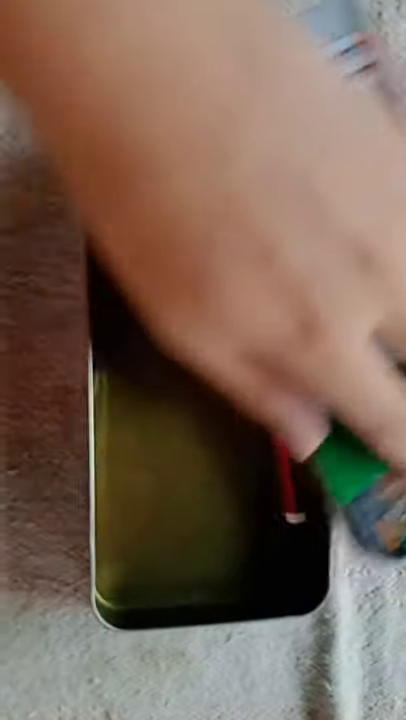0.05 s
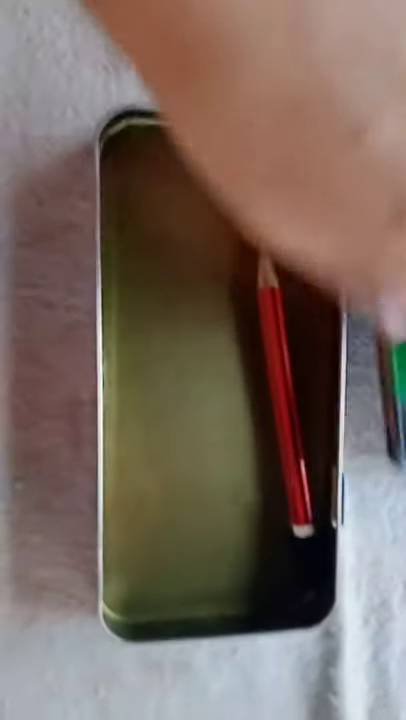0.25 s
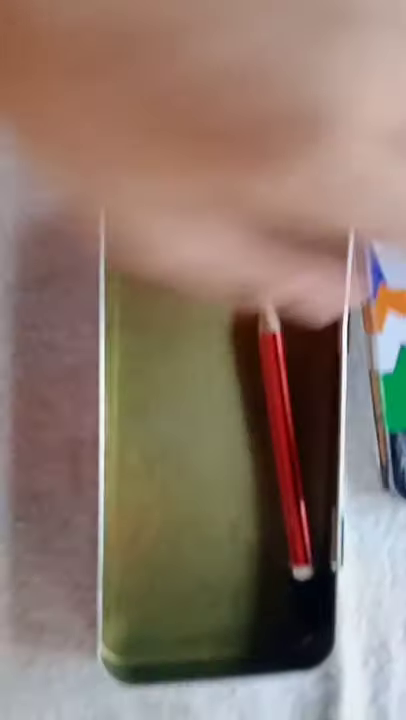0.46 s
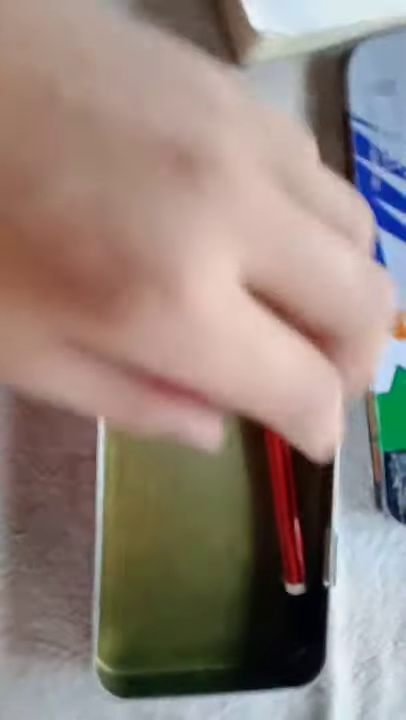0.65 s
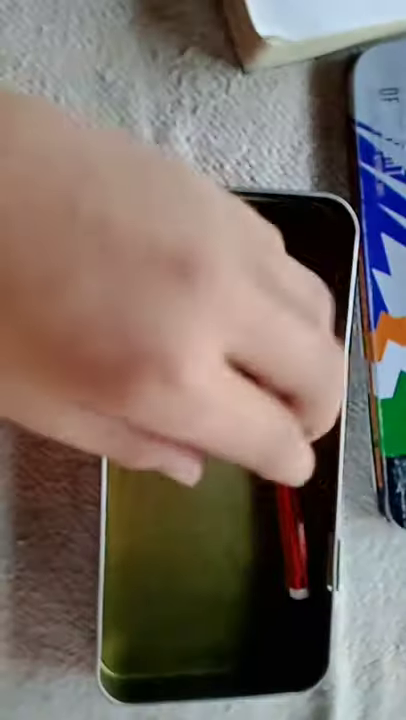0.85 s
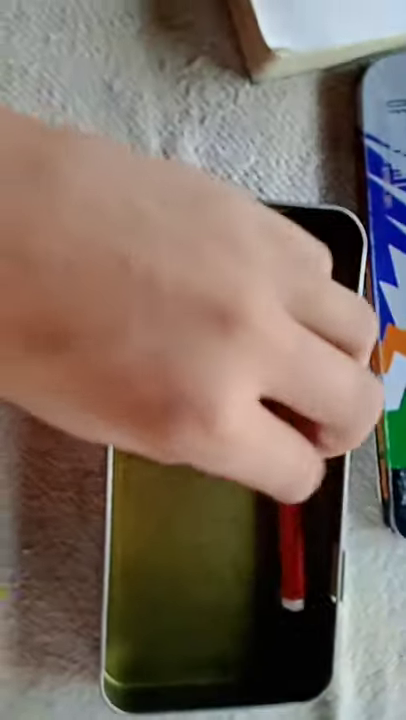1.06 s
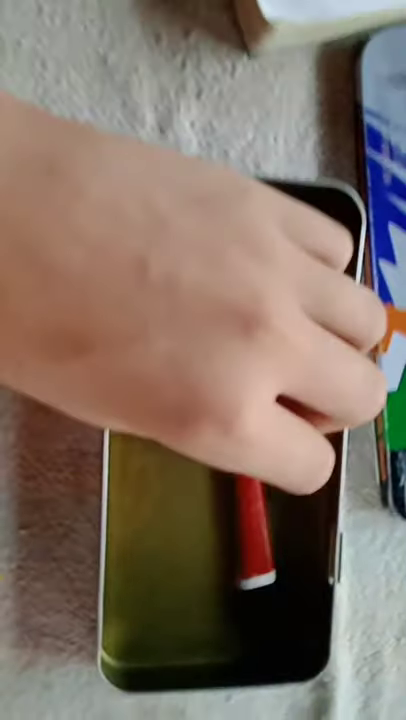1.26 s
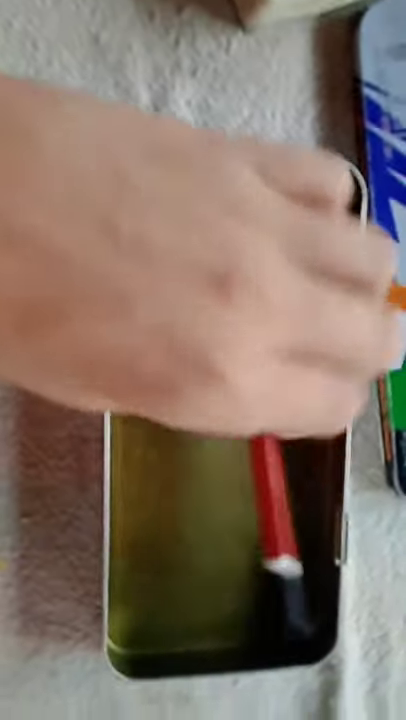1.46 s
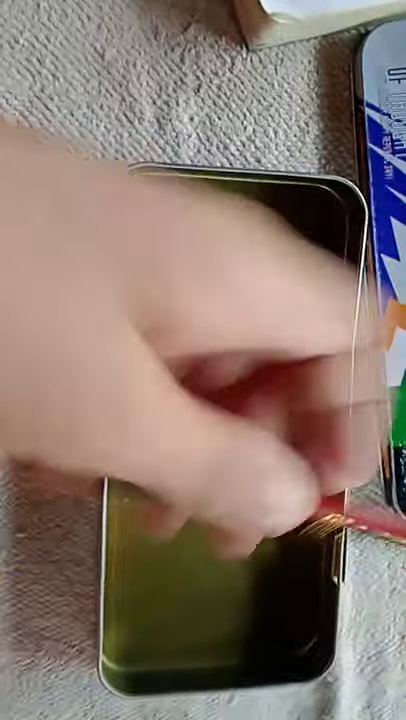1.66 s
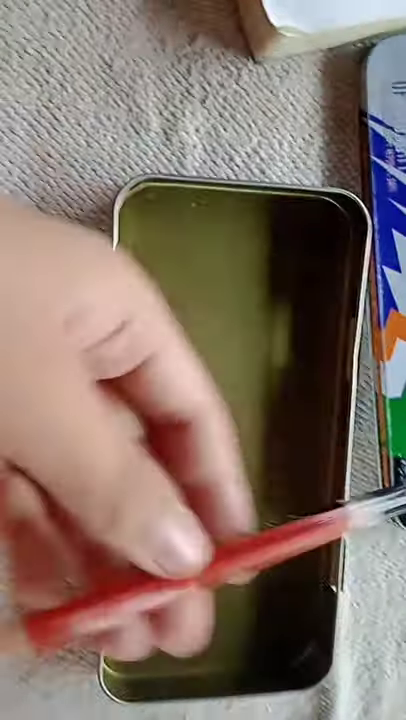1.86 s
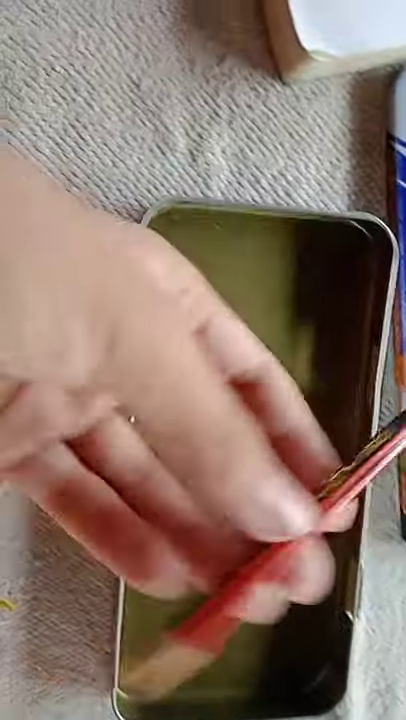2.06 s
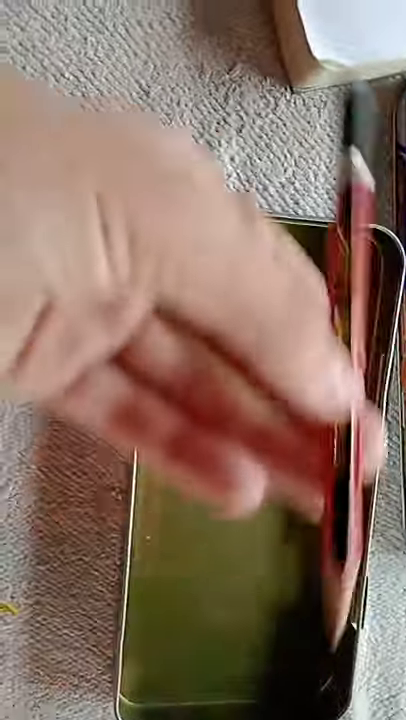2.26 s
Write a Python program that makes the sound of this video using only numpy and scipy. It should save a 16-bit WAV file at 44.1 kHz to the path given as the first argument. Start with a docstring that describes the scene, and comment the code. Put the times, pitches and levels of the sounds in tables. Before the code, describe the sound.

A metal pencil tin is opened close by in a quiet room. After light taps at the start, the thin lid scrapes along the rim at about 0.2 seconds and clatters brightly from 0.3 to 0.5. It slides with a faint hiss until 0.8. A light tap comes at 0.9, a faint pencil scratch near 1.45, and a very soft hand bump around 2 seconds.

```python
"""Light taps on a pencil tin, then its thin metal lid scrapes along the rim and clatters down beside it.
The lid slides briefly on the table cloth; a pencil is picked out, touching the tin lightly.
Scrape, knocks and taps are runs of tiny contacts ringing the metal, damped while a hand holds it.
The hand bumps the table and a quiet room murmurs underneath.
The microphone is close and narrow-band, with little above 7.7 kHz."""
import sys
import numpy as np
from scipy import signal
from scipy.fft import rfft, irfft
from scipy.io import wavfile
from scipy.ndimage import uniform_filter1d

SR = 44100
rng = np.random.default_rng(int(sys.argv[2]) if len(sys.argv) > 2 else 0)


def wav_out(sig):
    """Save sig, one row per channel (or a flat mono array), as 16-bit PCM at SR to the path in sys.argv[1]."""
    wavfile.write(sys.argv[1], SR, np.round(np.clip(np.atleast_2d(sig).T, -1, 1) * 32767).astype(np.int16))


N = 101429
TIME = np.arange(N) / SR

# spectrum of the tin under a soft contact, mostly its middle modes: frequency_hz, level_db
SOFT_CONTACT_SPECTRUM = [(1700, -43.5), (2200, -20), (2500, -33.5), (2850, -2), (3200, -3.5), (3650, -4.5),
                         (3820, -18), (4050, -49.5), (7000, -71.5)]


def amp(db):
    """Decibels to gain."""
    return 10 ** (np.asarray(db) / 20)


def unit(x):
    """Scales to an rms of 1."""
    return x / np.sqrt(np.mean(x ** 2) + 1e-20)


def decay(t, t60_s):
    """Exponential fade, 60 dB down after t60_s."""
    return np.exp(-np.log(1000) * t / t60_s)


def curve_at(points, hz):
    """Reads a curve on a log-frequency axis."""
    point_hz, value = np.transpose(points)
    return np.interp(np.log(hz + 1), np.log(point_hz), value)


def envelope(points, column=1):
    """Gain over time from a column of a dB curve; silent outside it."""
    rows = np.array(points)
    return amp(np.interp(TIME, rows[:, 0], rows[:, column], left=-140, right=-140))


def causal_filter(x, gain):
    """Applies a gain per frequency at minimum phase, so nothing rings ahead of the sound."""
    cepstrum = irfft(np.log(np.maximum(gain, 1e-5)))
    cepstrum[1:len(x)] *= 2
    cepstrum[len(x) + 1:] = 0
    return irfft(rfft(x, 2 * len(x)) * np.exp(rfft(cepstrum)))[:len(x)]


def colour(x, spectrum):
    """Filters by a spectrum that falls away steeply below its first point."""
    hz = np.fft.rfftfreq(2 * len(x), 1 / SR)
    low_cut = np.minimum(hz / spectrum[0][0], 1) ** 2
    return causal_filter(x, amp(curve_at(spectrum, hz)) * low_cut)


def band(x, centre_hz, half_width_hz):
    """Keeps one steep-sided band."""
    hz = np.fft.rfftfreq(2 * len(x), 1 / SR)
    return causal_filter(x, 1 / (1 + ((hz - centre_hz) / half_width_hz) ** 6))


def even_out(x, smoothing_hz=130):
    """Levels the broad humps of a spectrum and keeps its fine modes."""
    power = abs(rfft(x, 2 * len(x))) ** 2
    humps = uniform_filter1d(power / power.mean(), round(smoothing_hz * 2 * len(x) / SR))
    return causal_filter(x, 1 / np.sqrt(abs(humps) + 1e-9))


def add(mix, start_s, level_db, sound):
    """Mixes in a sound whose energy equals that of 20 ms at the given level."""
    gain = amp(level_db) * np.sqrt(.02 * SR) / (np.linalg.norm(sound) + 1e-12)
    part = mix[max(round(start_s * SR), 0):][:len(sound)]
    part += gain * sound[:len(part)]


def room_tone():
    """Low room noise, which sinks under the clatter and creeps back."""
    # murmur of the room: frequency_hz, level_db
    spectrum = [(15, -43.5), (25, -13.5), (70, -3), (103, -7), (256, 1), (434, -7.5), (466, -8),
                (912, -11.5), (1920, -21.5), (2500, -24), (3250, -21.5), (4030, -23.5), (5770, -31),
                (6510, -37.5), (7700, -49.5), (10000, -78.5), (16900, -120)]
    # its loudness: time_s, level_db
    loudness = [(0, -57), (.22, -58), (.33, -65.5), (.5, -73), (.6, -72), (.7, -65.5), (.82, -62.5),
                (1, -59), (1.4, -60), (2.3, -59.5)]
    gain = amp(np.interp(TIME, *np.transpose(loudness)))
    return gain * unit(colour(rng.standard_normal(N), spectrum))


def hand_bumps():
    """Dull swells from the hand moving on the covered table."""
    # soft bumps: start_s, level_db, length_s, pitch_hz
    bumps = [(.1, -58, 0.12, 30), (.13, -61.5, 0.097, 170), (0.401, -64, .17, 89.6), (.88, -63, 0.13, 90),
             (2.015, -56.5, 0.054, 279.6), (2.03, -67, 0.15, 85)]
    out = np.zeros(N)
    for start_s, level_db, length_s, pitch_hz in bumps:
        swell = np.sin(np.pi * np.clip((TIME - start_s) / length_s, 0, 1))
        rumble = unit(band(rng.standard_normal(N), pitch_hz, half_width_hz=.25 * pitch_hz))
        out += amp(level_db) * swell * rumble
    return out


def tin_ring(sheet_db=10.5, crack_db=-1, split_hz=23, partner_gain=.6):
    """The tin's answer to one contact: a crack, a dense shimmer and beating pairs of clear modes."""
    # clear modes of the tin: pitch_hz, relative_db, t60_s
    modes = [(790, -17, .1), (880, -19, .09), (1275, -14, .11), (2080, -22, .09), (2850, -8, .16),
             (2960, -11, .25), (3040, -9, .25), (3110, -11, .23), (3410, -10, .14), (3650, -8, .15),
             (5090, -8, .13), (5243, -14, .24), (5670, -8, .15), (6290, -12, .13), (6600, -12, .15)]
    # dense ring of the sheet metal and the table around it: frequency_hz, t60_s
    sheet_t60 = [(700, .1), (1700, .09), (2300, .12), (3000, .175), (4500, .195), (7500, .18)]
    t = TIME[:SR // 3]
    bin_hz, frame_s, noise_bins = signal.stft(rng.standard_normal(len(t)), SR, nperseg=256)
    fade = amp(-60 * frame_s / curve_at(sheet_t60, bin_hz)[:, None])
    shimmer = signal.istft(noise_bins * fade, SR, nperseg=256)[1][:len(t)]
    crack = rng.standard_normal(len(t)) * decay(t, t60_s=.02)
    ring = amp(sheet_db) * unit(even_out(unit(shimmer) + amp(crack_db) * unit(crack)))
    for (hz, db, t60_s), (phase, partner_phase, split) in zip(modes, rng.random((len(modes), 3))):
        # tin and lid ring in close pairs that beat
        partner_hz = hz + split_hz * (.5 + split)
        tone = np.sin(2 * np.pi * (hz * t + phase))
        partner = partner_gain * np.sin(2 * np.pi * (partner_hz * t + partner_phase))
        ring += .5 * amp(db) * unit((tone + partner) * decay(t, t60_s))
    return ring


def contacts(size, per_s, spread_db):
    """Tiny metal contacts at random moments, of uneven strength."""
    chance, polarity = rng.random((2, size))
    hit = chance < per_s / SR
    hit[0] = True
    strength = amp(spread_db * np.clip(rng.standard_normal(size), -2, 2))
    return hit * np.sign(polarity - .5) * strength


def chatter(ring, length_s, fade_db=10):
    """A quick run of contacts, fade_db weaker after length_s, rings the tin."""
    t = TIME[:len(ring)]
    push = amp(-fade_db * np.minimum(t / length_s, 10) ** 2)
    hits = contacts(len(t), per_s=2900, spread_db=6) * push
    return signal.fftconvolve(hits, ring)[:len(t)]


def metallic_hiss(ring):
    """Faint metallic hiss from just before the scrape, swelling later as the lid slides."""
    # loudness of the hiss: time_s, level_db
    loudness = [(.11, -95), (.135, -74.5), (.2, -75.5), (.46, -68), (.55, -67.5), (.6, -70.5), (.67, -68.5),
                (.72, -65.5), (.77, -72), (.805, -67.5), (.83, -80), (.86, -100)]
    # its colour: frequency_hz, level_db
    spectrum = [(2500, -21), (4200, -2.5), (5250, 3.5), (5900, -6.5), (6700, 5.5), (7300, -7.5),
                (7700, -18)]
    hiss = signal.fftconvolve(rng.standard_normal(N), ring)[:N]
    return envelope(loudness) * unit(colour(hiss, spectrum))


def pencil_scratches(ring):
    """The pencil's tip scratches the bottom of the tin as it is lifted."""
    # strokes of the tip: start_s, level_db, length_s
    scratches = [(1.449, -59.5, 0.017), (1.463, -61.5, 0.0067), (1.812, -76, .003)]
    # the scratched tin: frequency_hz, level_db
    spectrum = [(1500, -31), (3000, 14.5), (4200, 7), (6000, 2), (7200, -2), (7700, -8)]
    out = np.zeros(N)
    for start_s, level_db, length_s in scratches:
        add(out, start_s, level_db, colour(chatter(ring, length_s), spectrum))
    return out


def light_touches(ring, tone_fade_s=.013):
    """Soft contacts stir the tin's middle modes, each with one short tone of its own."""
    # touches on the tin: start_s, level_db, length_s, tone_relative_db, pitch_hz
    touches = [(0.0, -33, 0.0095, -37, 3000), (.008, -35, 0.011, -15, 5465), (0.022, -37, .012, -16, 2210),
               (0.915, -60.5, .006, 8.5, 3030), (0.925, -42.5, 0.0072, -0.5, 3603),
               (1.332, -79, .005, 9, 3430), (1.4444, -71, .006, 11, 6500)]
    tone_fade = np.exp(-TIME[:len(ring)] / tone_fade_s)
    out = np.zeros(N)
    for start_s, level_db, length_s, tone_db, pitch_hz in touches:
        add(out, start_s, level_db, colour(chatter(ring, length_s), SOFT_CONTACT_SPECTRUM))
        tone = band(chatter(ring, length_s), pitch_hz, half_width_hz=172)
        add(out, start_s, level_db + tone_db, tone * tone_fade)
    return out


def rim_scrape(ring):
    """A rim-on-rim scrape, heard first as a narrow ring, then widening to rasp and treble."""
    # loudness of the scrape's three bands: time_s, middle_db, rasp_db, treble_db
    loudness = [(.168, -54.5, -86, -92), (.175, -30, -77.5, -79), (.186, -27, -51.5, -83),
                (.199, -31.5, -33.5, -57), (.211, -41, -23.5, -39), (.225, -41.5, -21, -31.5),
                (.25, -35, -19.5, -31), (.267, -30, -18, -21), (.28, -28, -19.5, -25.5),
                (.288, -37.5, -25, -32), (.298, -33.5, -19.5, -22.5), (.31, -54, -52.5, -43)]
    # their colours: frequency_hz, level_db
    middle = [(2450, -55), (2700, -12), (2900, 0.5), (3120, 0.5), (3450, -5.5), (3700, -22), (4000, -59),
              (7000, -70)]
    rasp = [(1720, -61.5), (1920, -24.5), (2220, -10), (2500, -22.5), (2900, -7), (3550, 1), (4000, -7.5),
            (4280, -20), (4700, -42.5), (7000, -65.5)]
    treble = [(4700, -42.5), (5100, -2.5), (5450, 3), (5750, -2), (6600, -3), (7200, -10), (7700, -27)]
    slips = unit(contacts(N, per_s=2600, spread_db=1))
    out = np.zeros(N)
    for column, spectrum in enumerate([middle, rasp, treble], 1):
        body = colour(ring, spectrum)
        out += signal.fftconvolve(slips * envelope(loudness, column), body / np.linalg.norm(body))[:N]
    return out


def lid_clatter(ring, clank_db=-22, mellow_db=-2, leaning_until_s=.345):
    """The lid drops and rocks against the tin, each knock a short buzz with a thin low clank."""
    # knocks of the landing lid: start_s, level_db, length_s, clank_trim_db
    knocks = [(.2915, -24.5, 0.0097, -9), (0.3016, -16, 0.017, 6.5), (.3145, -18, 0.014, 1),
              (0.327, -20.5, 0.015, 0), (0.3504, -17, 0.017, 3), (0.369, -20, .015, -2.5),
              (0.386, -22, .014, -3.5), (0.3943, -17, .02, 1.5), (0.413, -29, .022, -1)]
    # bright and low parts of a knock: frequency_hz, level_db
    bright = [(1700, -36.5), (2070, 0.5), (2450, -7.5), (2800, 4), (3200, -2.5), (3900, -5), (4600, -6.5),
              (5100, 1.5), (5500, -5), (6550, 1.5), (7200, -7), (7700, -24)]
    clank = [(430, -27), (690, -11.5), (765, 2.5), (950, 3), (1100, -4), (1300, 4.5), (1750, 2.5),
             (2200, -11)]
    out = np.zeros(N)
    for start_s, level_db, length_s, clank_trim_db in knocks:
        buzz = chatter(ring, length_s)
        add(out, start_s, level_db, colour(buzz, bright))
        add(out, start_s, level_db + clank_db + clank_trim_db, colour(buzz, clank))
        if start_s < leaning_until_s:  # still on the rim, the lid rings more in the middle
            mellow = colour(chatter(ring, length_s), SOFT_CONTACT_SPECTRUM)
            add(out, start_s, level_db + mellow_db, mellow)
    return out


def scene():
    """At the table, in mono: the metal rings freely when the lid lands, and is damped while held."""
    free = tin_ring()
    held = free * decay(TIME[:len(free)], t60_s=.25)
    metal = rim_scrape(held) + lid_clatter(free) + light_touches(held) + pencil_scratches(held)
    return (metal + metallic_hiss(free) + hand_bumps() + room_tone())[None]


def record(dry):
    """The close microphone: a brief dip after the clatter, rounded treble peaks, then the band limit."""
    dip_db, dip_at_s, dip_half_width_s = -13, .576, .013
    ceiling, rounding_above_hz, band_edge_hz = .6, 900, 7740
    dipped = dry * amp(dip_db * np.exp(-((TIME - dip_at_s) / dip_half_width_s) ** 4))
    soft_clipped = dipped / (1 + (dipped / ceiling) ** 8) ** (1 / 8)
    high_pass = signal.butter(2, rounding_above_hz, "high", fs=SR, output="sos")
    rounded = dipped - signal.sosfilt(high_pass, dipped - soft_clipped)
    low_pass = signal.firwin(1023, band_edge_hz, window=("kaiser", 9), fs=SR)
    return signal.oaconvolve(rounded, low_pass[None], "same")


dry = scene()
out = record(dry)
wav_out(out)
```